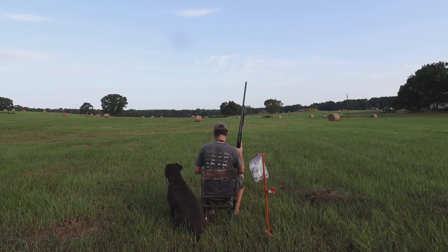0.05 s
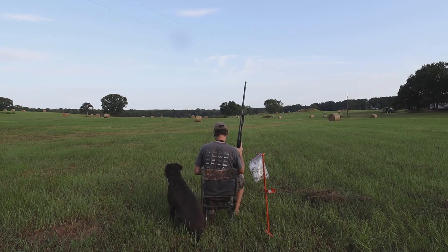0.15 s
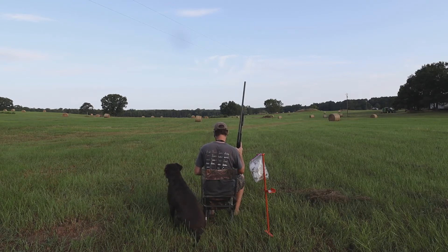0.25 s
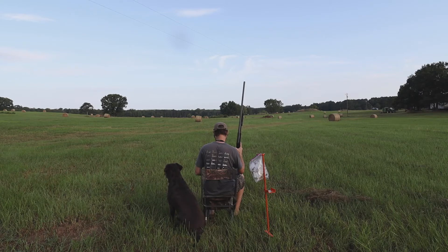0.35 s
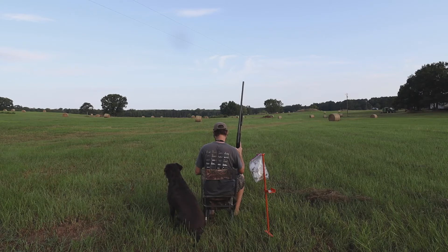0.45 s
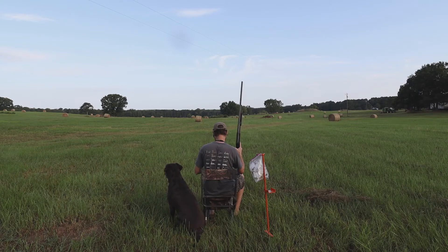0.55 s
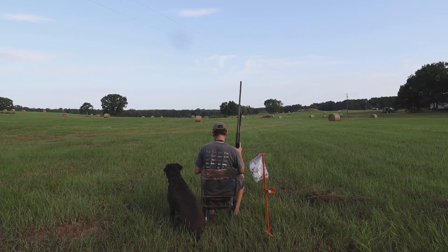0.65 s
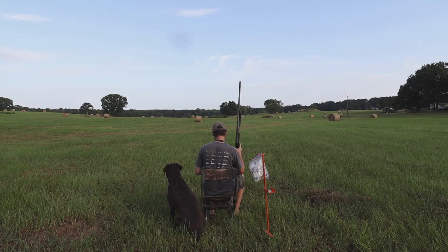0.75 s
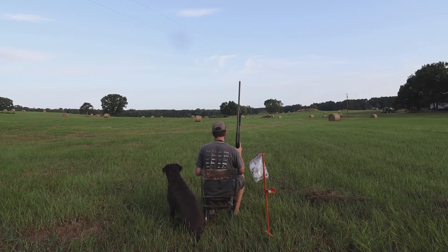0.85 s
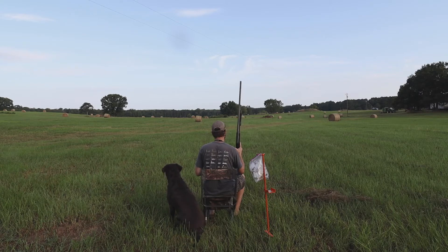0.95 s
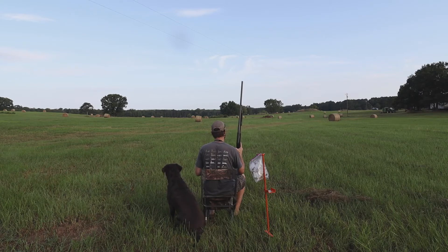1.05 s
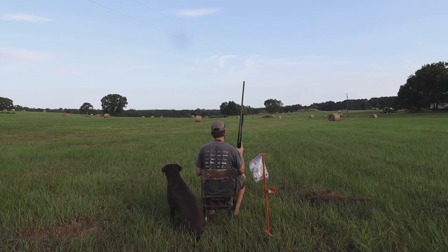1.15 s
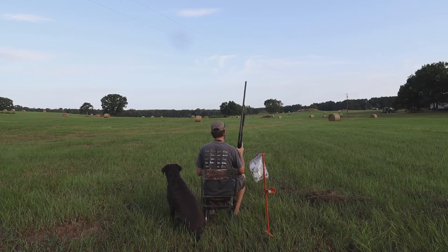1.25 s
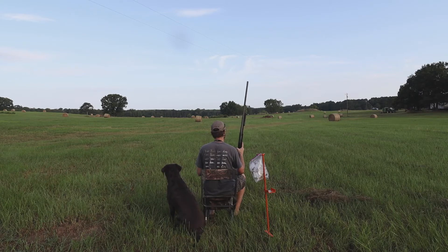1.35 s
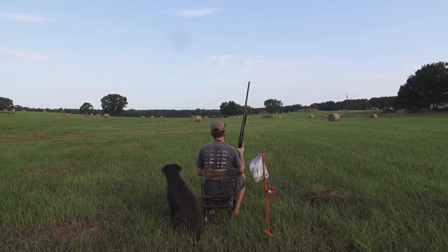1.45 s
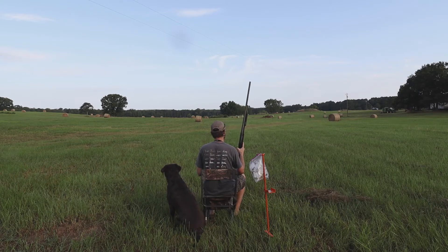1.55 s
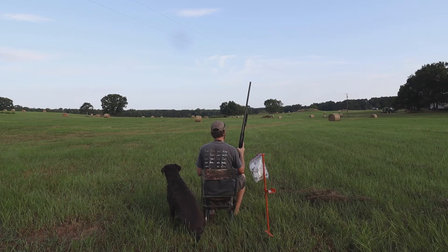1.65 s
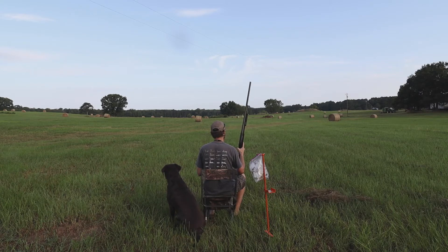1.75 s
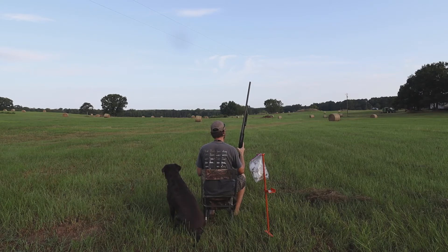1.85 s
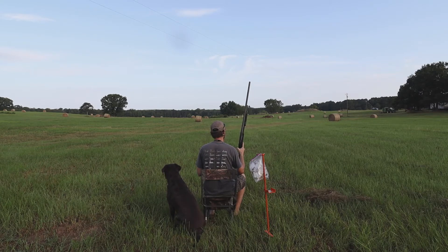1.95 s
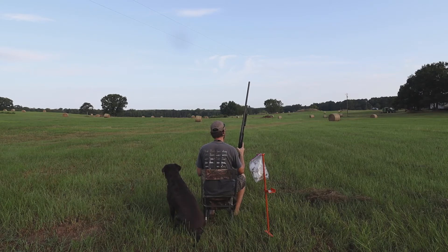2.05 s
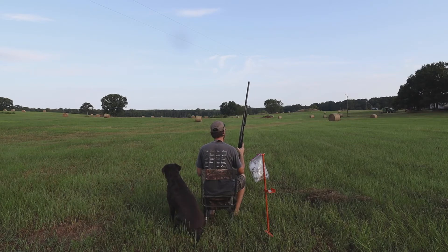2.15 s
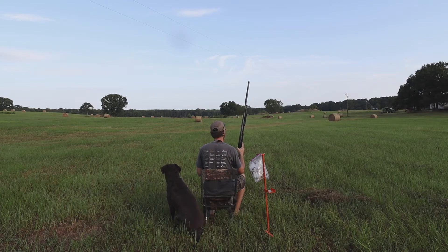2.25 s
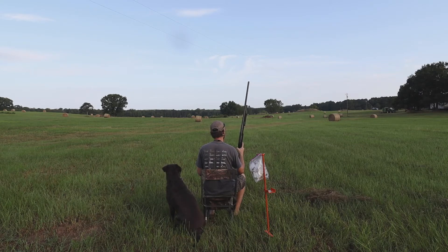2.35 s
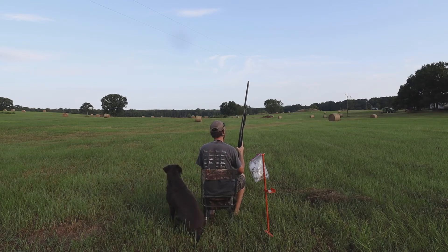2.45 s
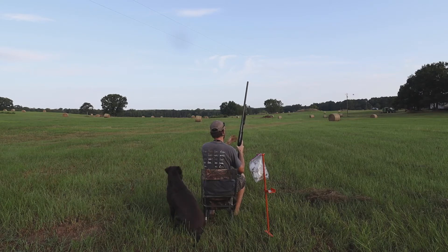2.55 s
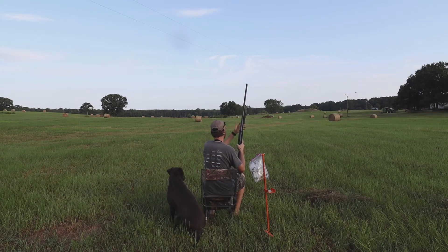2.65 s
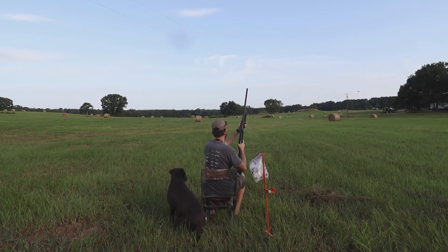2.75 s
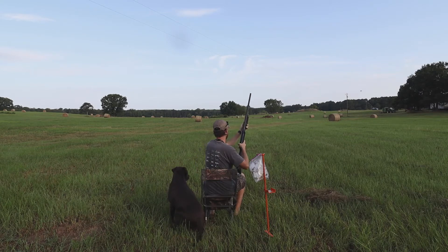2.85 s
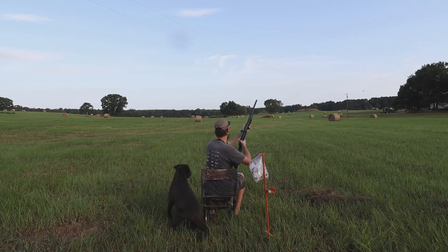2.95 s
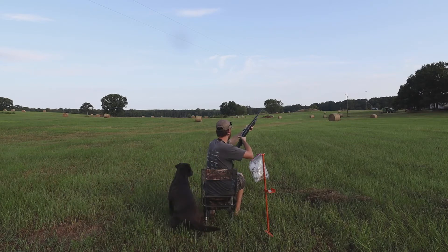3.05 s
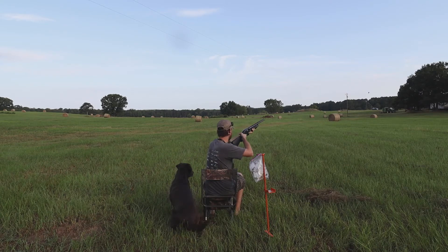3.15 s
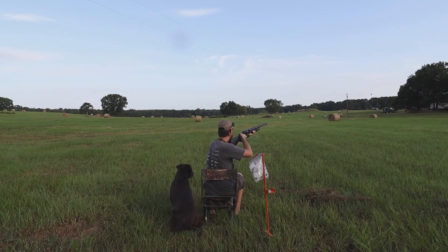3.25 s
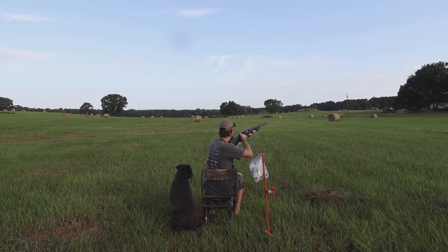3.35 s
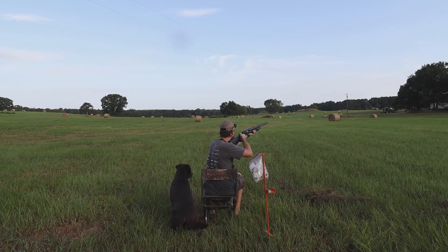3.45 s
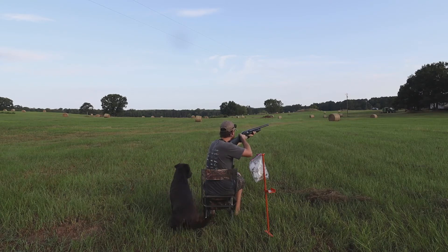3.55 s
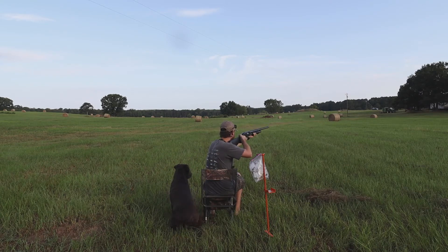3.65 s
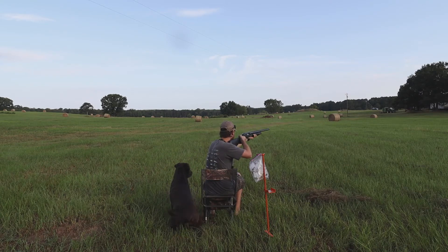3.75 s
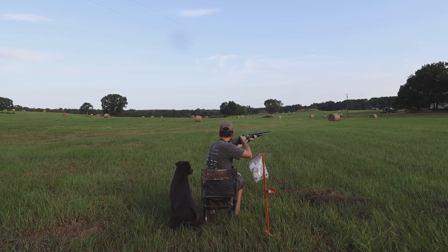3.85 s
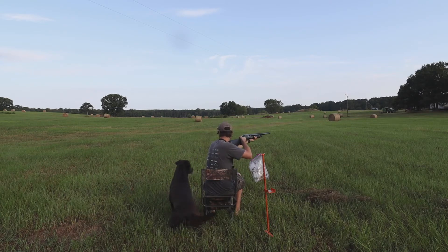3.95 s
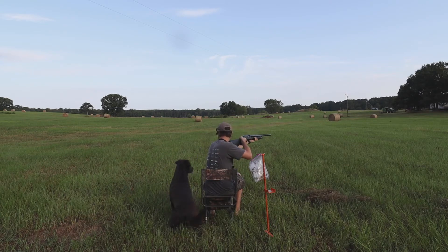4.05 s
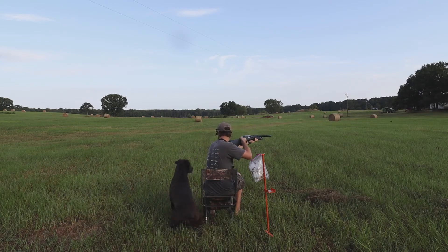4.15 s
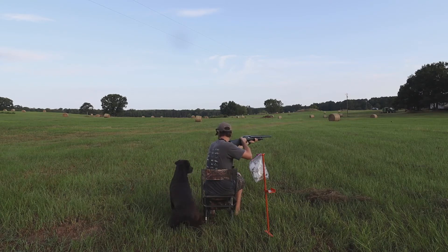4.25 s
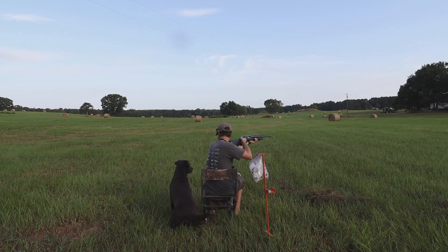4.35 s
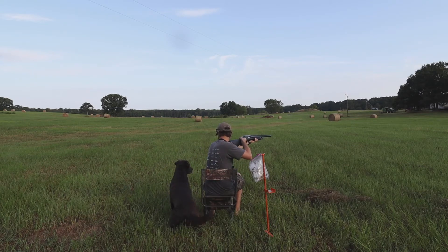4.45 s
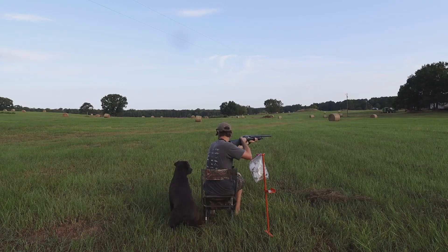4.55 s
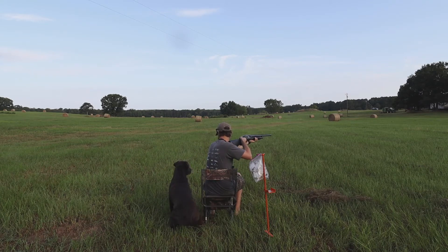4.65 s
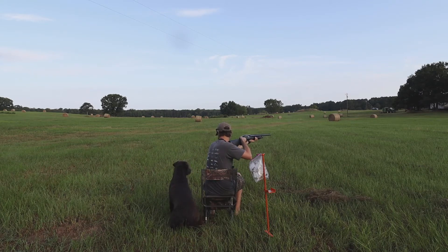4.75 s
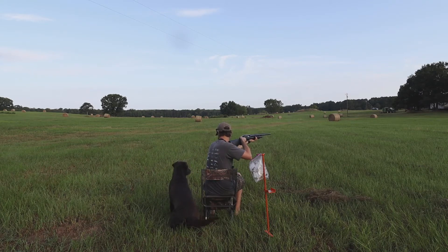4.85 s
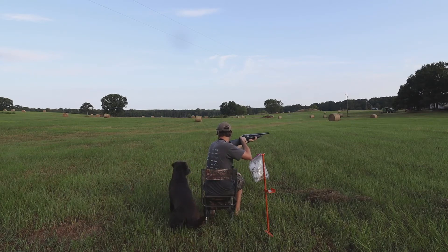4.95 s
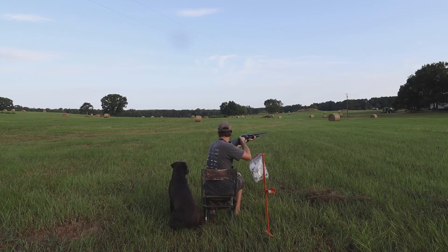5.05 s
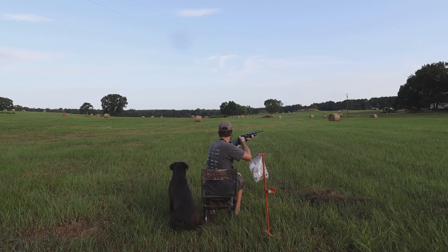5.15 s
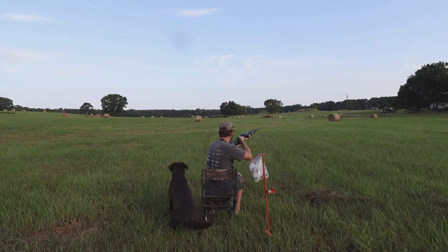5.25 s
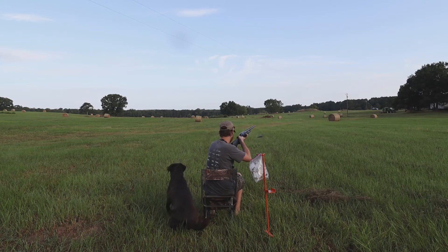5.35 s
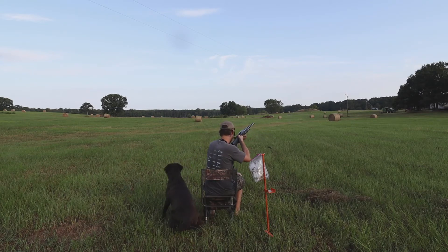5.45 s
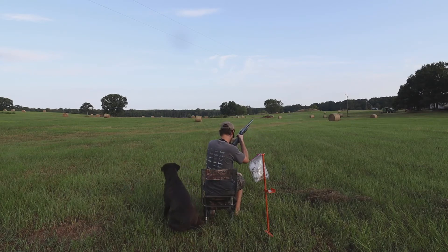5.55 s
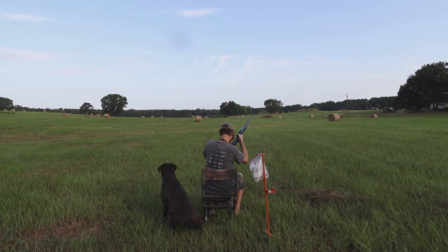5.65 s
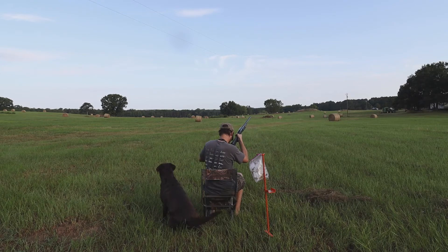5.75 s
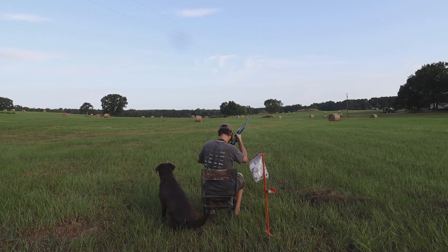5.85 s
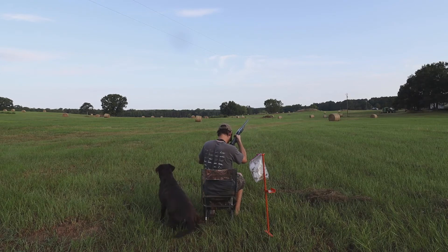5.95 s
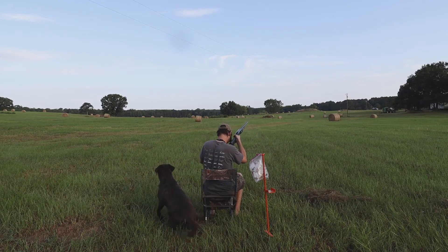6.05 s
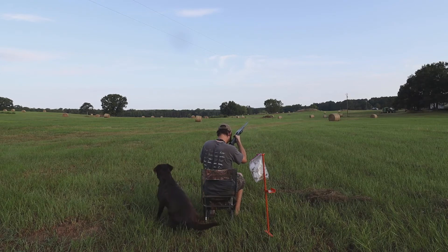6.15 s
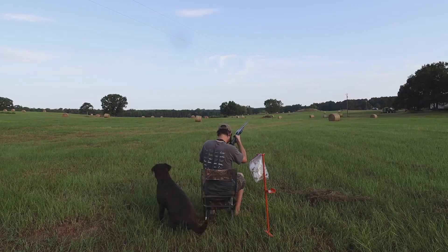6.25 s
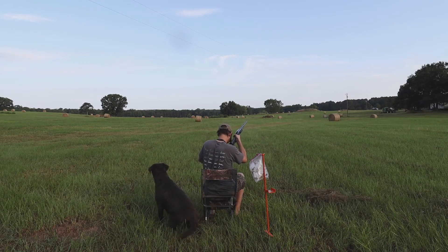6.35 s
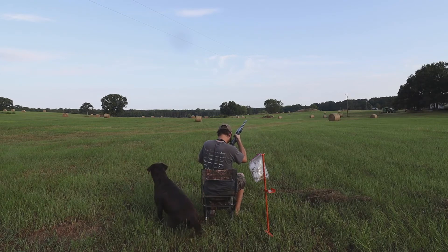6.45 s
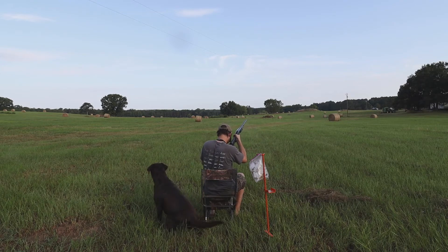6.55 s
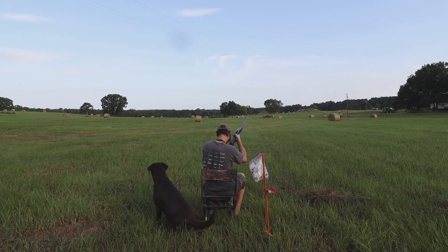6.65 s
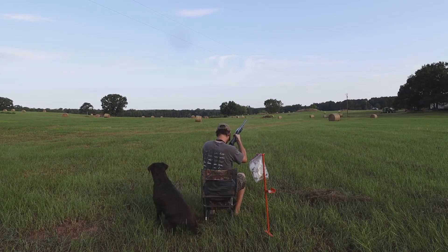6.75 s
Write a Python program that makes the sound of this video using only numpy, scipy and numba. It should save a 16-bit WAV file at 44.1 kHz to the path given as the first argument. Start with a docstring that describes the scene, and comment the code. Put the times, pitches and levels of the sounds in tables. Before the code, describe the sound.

Shrill insects and a far engine drone; catches click, one loud shotgun shot overloads the microphone, echoes return, a bird whistles, the pump clatters.

```python
"""An open hay field: insects shrill and a far engine drones throughout, a few metres from shooter to camera.
Birds whistle, catches click and cloth brushes as a shotgun is shouldered, then it fires once: bursts of noise.
Bales and two tree lines return wavelets and a grainy wash; a soft, low echo of the shot thuds back.
A bird whistles gliding tones, the action is racked with scrapes and ringing knocks, and cloth brushes again.
The microphone overloads on the bangs, and its gain control ducks the field after them."""
import sys
import numpy as np
from scipy import signal
from scipy.fft import rfft, irfft
from scipy.io import wavfile
from numba import njit

SR = 44100
rng = np.random.default_rng(int(sys.argv[2]) if len(sys.argv) > 2 else 0)


def transcribe(signal):
    """Save signal, clipped to [-1, 1], as a 16-bit WAV file at the path in sys.argv[1]."""
    frames = np.atleast_2d(signal).T
    limited = np.clip(frames, -1, 1)
    pcm = np.round(limited * 32767).astype(np.int16)
    wavfile.write(sys.argv[1], SR, pcm)


N = 299880
T = np.arange(N) / SR  # s

# Pressure fronts of the shot. Each row: start in seconds, level in dB, length in seconds, t60 in seconds,
# ring of the microphone housing in dB above that level.
BLAST = [(3.6037, -20, 0.0018, 0.01, -29), (3.6117, 5, 0.0026, 0.0098, -1.5),
         (3.6151, 13, 0.0024, 0.0023, -9), (3.6202, -4.5, 0.002, 0.067, 0)]
MUZZLE_S = BLAST[2][0]  # the strongest front


def undb(db):
    """Decibels to gain."""
    return 10 ** (np.asarray(db) / 20)


def unit(x):
    """Scale to rms 1."""
    return x / np.sqrt(np.mean(x ** 2))


def curve(rows):
    """The columns of a table, joined by straight lines in time."""
    s, *columns = np.transpose(rows)
    return [np.interp(T, s, c) for c in columns]


def noise():
    """White noise of rms 1."""
    return rng.standard_normal(N)


def walk(rate):
    """Random wander: normal draws, rate per second, joined by straight lines."""
    return np.interp(T * rate, np.arange(4096), rng.standard_normal(4096))


def colour(x, points, size=4096):
    """Causal filter shaped by (Hz, relative dB) points that keeps the power of white noise."""
    hz, db = np.transpose(points)
    bins = np.maximum(np.fft.rfftfreq(size, 1 / SR), 1)
    gains_db = np.interp(np.log(bins), np.log(hz), db)
    # folding the cepstrum onto its first half gives minimum phase
    cepstrum = irfft(np.log(undb(gains_db)))
    cepstrum[size // 2:] = 0
    response = irfft(np.exp(2 * rfft(cepstrum)))
    return signal.fftconvolve(x, response / np.linalg.norm(response))[:N]


def band(x, hz, width):
    """A resonance applied twice, for steep skirts."""
    b, a = signal.iirpeak(min(hz, SR / 2 - 1), hz / min(width, SR / 3), fs=SR)
    once = signal.lfilter(b, a, x)
    return signal.lfilter(b, a, once)


def burst(start, length, t60):
    """Envelope that jumps up, holds for a length and dies away."""
    out = np.zeros(N)
    alive = slice(int(start * SR), int((start + length + 2 * t60) * SR))
    out[alive] = np.exp(-np.log(1000) * np.maximum(T[alive] - start - length, 0) / t60)
    return out


def ring(start, hz, t60):
    """One struck mode: a sine that starts at full strength and dies away."""
    out = burst(start, 0, t60)
    alive = out > 0
    out[alive] *= np.sin(2 * np.pi * hz * (T[alive] - start))
    return out


def struck(force, modes):
    """A body of (Hz, dB, t60) modes driven by a force."""
    response = sum((-1) ** k * undb(db) * ring(0, hz, t60) for k, (hz, db, t60) in enumerate(modes))
    return signal.fftconvolve(force, response[:SR // 2])[:N]


@njit
def follow(x, attack, release):
    """Level detector with one step share for rising and another for falling."""
    out, e = np.empty(len(x)), 0.
    for i in range(len(x)):
        e += (abs(x[i]) - e) * (attack if abs(x[i]) > e else release)
        out[i] = e
    return out


def shot(housing_hz=5280, housing_width_hz=900, hiss_db=-31, hiss_t60=0.57):
    """Hammer, muzzle blast and its ground bounces; they set the camera's housing and mount ringing."""
    # Tone of the blast. Each row: frequency in Hz, relative level in dB.
    blast_colour = [(25, -7), (110, 14), (220, -0.5), (400, 6.5), (800, -2), (1500, 6), (3500, 3.5),
                    (6500, -4.5), (8200, 4.5), (11000, -10.5), (15000, -14)]
    # The blast shakes the camera on its mount. Each row: frequency in Hz, level in dB, t60 in seconds.
    mount_modes = [(114.8, -22.5, 0.5), (129, 3.5, 0.03), (308, -11, 0.026)]
    fronts = sum(undb(db) * burst(s, length, t60) for s, db, length, t60, _ in BLAST)
    shaken = sum(undb(db + ring_db) * burst(s, length, t60) for s, db, length, t60, ring_db in BLAST)
    housing = shaken * unit(band(noise(), housing_hz, housing_width_hz))
    mount = sum(undb(db) * ring(MUZZLE_S, hz, t60) for hz, db, t60 in mount_modes)
    # the nearest blades throw back the brightest part
    hiss = undb(hiss_db) * burst(MUZZLE_S, 0, hiss_t60) * noise()
    return colour(fronts * noise(), blast_colour) + housing + mount + hiss


def returning(s, build, t60):
    """Envelope of the return from one stand: it builds up as the front reaches it, then dies away."""
    fired = T > MUZZLE_S
    rise = -(np.minimum(T - s, 0) / build) ** 2
    fall = -np.log(1000) * np.maximum(T - s, 0) / t60
    return fired * np.exp(rise + fall)


def wavelet(hz, cycles):
    """The report after one reflection: a short swing of pressure, centred in 10 ms."""
    t = T[:SR // 100]
    turns = (t - t.mean()) * hz
    return -np.cos(2 * np.pi * turns) * np.exp(-(turns / cycles) ** 2)


def echoes(cycles=0.72, lag_s=0.0007, grain_db=4.5, grain_rate=600, trunk_spread_db=3):
    """The report returns as short wavelets from single objects and as a grainy wash from foliage."""
    # Loudest single echoes, off bales and trunks. Each row: time in seconds before the lag, peak in dB,
    # centre in Hz.
    loudest = [(3.687, -11.5, 1800), (3.819, -15, 1570), (3.861, -23, 1172), (3.887, -20, 1770),
               (3.921, -13.5, 1640), (3.932, -16, 1630), (3.979, -18, 1470), (4.0, -20.5, 1430),
               (4.067, -18.5, 1750), (4.279, -17, 1130), (4.298, -14, 1010), (4.309, -13.5, 1170),
               (4.339, -15, 1890), (4.396, -6, 2020), (4.401, -14, 1500), (4.422, -6.5, 1580),
               (4.45, -18.5, 1090)]
    # Stands of grass and trees. Each row: strongest return in seconds, body in dB, leaf hiss in dB,
    # build-up in seconds, t60 in seconds.
    stands = [(3.63, -37, -19, 0.01, 0.29), (3.818, -31, -26, 0.05, 0.3), (4.02, -43.5, -47.5, 0.081, 1.2),
              (4.302, -30, -41.5, 0.057, 0.57), (4.425, -37.5, -64, 0.04, 1.8)]
    # Tone of the boughs. Each row: frequency in Hz, relative level in dB.
    body_colour = [(100, -21), (350, -19), (700, -2), (1200, 2.5), (2000, 1.5), (3200, -6.5), (6000, -21),
                   (12000, -62)]
    # Tone of the leaves. Each row: frequency in Hz, relative level in dB.
    leaf_colour = [(800, -16), (2500, -5), (3600, -2.5), (4700, 4.5), (6000, 4), (7200, -6), (9000, -7.5),
                   (11000, -23), (15000, -33)]
    leaf_lead_s = 0.013  # the outer leaves answer before the boughs
    trunk_rate, trunk_db, trunk_hz, trunk_octaves = 36, -3, 1410, 0.34  # per s, dB, centre Hz, spread
    trunk_follows = 0.62  # share of the wash's rise and fall in dB that the trunk echoes follow

    body = sum(undb(db) * returning(s, build, t60) for s, db, _, build, t60 in stands)
    leaves = sum(undb(db) * returning(s - leaf_lead_s, build, t60) for s, _, db, build, t60 in stands)
    singles = [(s + lag_s, undb(db), hz) for s, db, hz in loudest]
    # the many lesser trunks, scattered in time, level and pitch
    for k, (early, loud, high) in enumerate(rng.uniform(-1, 1, size=(48, 3))):
        s = stands[1][0] + (k + 1 + early) / trunk_rate
        size = np.interp(s, T, body) ** trunk_follows * undb(trunk_db + trunk_spread_db * loud)
        singles.append((s, size, trunk_hz * 2 ** (trunk_octaves * high)))
    out = np.zeros(N)
    for s, size, hz in singles:
        swing = wavelet(hz, cycles)
        i = min(int(s * SR) - len(swing) // 2, N - len(swing))
        out[i:i + len(swing)] += size * swing
    # boughs answer more strongly than the gaps between
    crackle = undb(grain_db * np.minimum(walk(grain_rate), 2))
    boughs = body * colour(unit(noise() * crackle), body_colour)
    return out + boughs + leaves * colour(noise(), leaf_colour)


def low_echo(start_s=4.202, level_db=-38, hz=117, width_hz=110, length_s=0.016, t60=0.027):
    """A soft, low echo of the shot thuds back: a short burst of narrow noise."""
    return undb(level_db) * burst(start_s, length_s, t60) * unit(band(noise(), hz, width_hz))


def rack(steel_db=-41, stock_db=-22.5, scrape_db=-2, chatter_db=4, chatter_rate=450):
    """Steel parts scrape and slam home, ringing the receiver; a knock's heft sets the whole gun's ring."""
    # Knocks of slide, bolt and shell. Each row: start in seconds, relative level in dB, length in seconds,
    # heft in dB.
    hits = [(5.277, -31, 0.003, -3), (5.2923, -20.5, 0.004, -6), (5.3017, -14.5, 0.0054, 3),
            (5.345, -15, 0.0022, -14), (5.361, -22, 0.0021, -4), (5.3743, -2.5, 0.00079, -16),
            (5.3792, -11, 0.0015, -17), (5.3831, 1.5, 0.0045, -19), (5.3976, 5, 0.0018, 11),
            (5.406, 0, 0.0014, 3)]
    # Tone of scrape and knocks. Each row: frequency in Hz, relative level in dB.
    rack_colour = [(60, -24), (200, -29), (350, -17.5), (650, -14), (1300, -6.5), (2000, -2.5),
                   (3000, -5.5), (4200, -3), (6200, -9), (8200, -9), (9400, -10), (11000, -20.5),
                   (15000, -28)]
    # Ring of barrel and receiver. Each row: frequency in Hz, relative level in dB, t60 in seconds.
    gun_modes = [(1750, -5, .05), (2363, -7, .04), (2682, -4, .06), (2965, -4, .06), (4105, 1, .04),
                 (4214, 0, .04), (4298, -2, .04), (4445, -1, .04), (4538, -3, .04), (4662, -1, .04),
                 (4746, -2, .04), (5275, 2, .05), (5631, -1, .04), (7311, 0, .035), (8160, -4, .025),
                 (8960, -4, .025)]
    # Ring of the whole gun. Each row: frequency in Hz, relative level in dB, t60 in seconds.
    stock_modes = [(872, -5, .09), (1235, 0, .11), (1450, -6, .09)]
    # Slide back and forward. Each row: start in seconds, length in seconds, relative level at the end in dB.
    strokes = [(5.303, 0.018, -33), (5.327, 0.045, -17)]
    knock_t60, stroke_t60 = 0.023, 0.061  # s
    growth_db_per_s = 290  # the scrape grows as the slide gathers speed

    knocks = sum(undb(db) * burst(s, length, knock_t60) for s, db, length, _ in hits)
    sliding = 0
    for s, length, db in strokes:
        growth_db = growth_db_per_s * np.minimum(T - s - length, 0)
        sliding = sliding + undb(db + growth_db) * burst(s, length, stroke_t60)
    chatter = unit(undb(chatter_db * walk(chatter_rate)))  # the slide sticks and slips on its rails
    force = noise() * (knocks + sliding * chatter)
    blows = np.zeros(N)
    for s, db, _, heft_db in hits:
        blows[int(s * SR)] = undb(db + heft_db)
    scrape = undb(scrape_db) * colour(force, rack_colour)
    steel = undb(steel_db) * struck(force, gun_modes)
    return scrape + steel + undb(stock_db) * struck(blows, stock_modes)


def handling():
    """Small catches click and ring, and cloth brushes, as the gun is raised and lowered."""
    # Catches on gun and gear. Each row: start in seconds, level in dB, length in seconds, centre in Hz,
    # width in Hz, ring in dB above that level.
    clicks = [(2.158, -26, 0.0011, 3300, 3000, 2), (2.209, -42.5, 0.0037, 3450, 2500, 0),
              (2.663, -44, 0.0022, 4000, 1500, -6), (2.764, -37, 0.0016, 2140, 1700, 10.5),
              (2.8425, -29, 0.0046, 2010, 5840, -1.5), (2.9225, -32.5, 0.0005, 4150, 8000, -3)]
    # Ring of the catches. Each row: frequency in Hz, relative level in dB, t60 in seconds.
    catch_modes = [(870, 8, 0.018), (1376, 2, 0.034), (1790, 1, 0.024), (2020, 2.5, 0.02), (2380, -5, 0.02),
                   (3010, -3.5, 0.045), (3310, -6, 0.05), (4080, -8, 0.056), (4520, -5, 0.03),
                   (8600, 0, 0.02)]
    # Brushes of cloth. Each row: start in seconds, level in dB, length in seconds, centre in Hz, width in Hz.
    brushes = [(3.042, -53, 0.058, 5940, 10000), (5.46, -47, 0.016, 5540, 5000),
               (5.53, -50, 0.09, 5400, 3500), (5.897, -53, 0.006, 7000, 10000),
               (6.59, -58, 0.13, 6950, 9000)]
    click_t60, brush_t60 = 0.019, 0.11  # s

    ticks, taps = 0, 0
    for s, db, length, hz, width, ring_db in clicks:
        ticks = ticks + undb(db) * burst(s, length, click_t60) * unit(band(noise(), hz, width))
        impulse = signal.unit_impulse(N, int(s * SR)) + 1e-18  # the tiny offset is inaudible
        taps = taps + undb(db + ring_db) * band(impulse, hz, width)
    cloth = 0
    for s, db, length, hz, width in brushes:
        cloth = cloth + undb(db) * burst(s, length, brush_t60) * unit(band(noise(), hz, width))
    return ticks + struck(taps, catch_modes) + cloth


def grass(x, wet_db=-25, t60=0.27):
    """The grass all round scatters a faint, short tail of decaying noise."""
    tail = (noise() * burst(0, 0, t60))[:SR // 2]
    return x + undb(wet_db) * signal.fftconvolve(x, tail / np.linalg.norm(tail))[:N]


def birds(waver=0.0031, flutter_db=2.0):
    """Thin pure whistles that swell and fade while they slide towards a pitch; some lift at the close."""
    # Bird notes. Each row: start in seconds, length in seconds, level in dB before flutter, swell in seconds,
    # starting pitch in Hz, pitch it settles towards in Hz, glide time in seconds, closing lift in Hz.
    notes = [(1.56, 0.068, -53, 0.025, 4450, 3400, 0.053, 0),
             (1.79, 0.06, -54, 0.022, 4500, 3400, 0.045, 0),
             (1.995, 0.028, -56, 0.008, 3600, 4400, 0.015, 0),
             (4.845, 0.18, -43, 0.14, 3390, 2960, 0.036, 30),
             (5.526, 0.34, -38.5, 0.054, 3520, 2840, 0.016, 260)]
    fade_share, lift_time_s = 0.31, 0.0195  # a note fades over this share of its length
    out, pitch_wander, flutter = 0, 1 + waver * walk(74), undb(flutter_db * walk(49))
    for s, length, db, swell_s, start_hz, end_hz, glide_s, lift_hz in notes:
        age = np.clip(T - s, 0, length)
        left = length - age
        glide = (start_hz - end_hz) * np.exp(-age / glide_s)
        hz = end_hz + glide + lift_hz * np.exp(-left / lift_time_s)
        effort = np.minimum(age / swell_s, 1) * np.minimum(left / (fade_share * length), 1)
        out = out + effort * undb(db) * np.sin(2 * np.pi * np.cumsum(hz * pitch_wander) / SR)
    return out * flutter


def insects(throb_db=1.5, swell_db=0.2, unsteady=0.173):
    """Many stridulating insects blur into shrill bands of noise that throb with their wing strokes."""
    # Choruses. Each row: centre in Hz, width in Hz, mid level in dB, mean wing strokes per second.
    choruses = [(4760, 510, -55, 33), (5063, 480, -54.5, 46), (9120, 560, -55, 97), (9570, 210, -59.5, 31),
                (8620, 1200, -60, 58)]
    out = 0
    for hz, width, db, rate in choruses:
        strokes = np.sin(2 * np.pi * np.cumsum(rate * (1 + unsteady * walk(15))) / SR)
        level_db = db + throb_db * strokes + swell_db * walk(4.32)
        out = out + unit(band(noise(), hz, width)) * undb(level_db)
    return out


def field(waver=0.0051, flicker_db=1.2):
    """A far engine with three wavering tones and a rumble, under a soft, faintly humming wash of air."""
    # Tones of the far engine. Each row: mean frequency in Hz, level in dB.
    drone = [(66.4, -49), (76, -51), (153, -59.5)]
    # The engine's rumble over time. Each row: time in seconds, level in dB.
    rumble_level = [(0, -51), (1.4, -48.5), (2.5, -45.5), (4.4, -46.5), (5.2, -43), (6.8, -45.5)]
    # Tone of the rumble. Each row: frequency in Hz, relative level in dB.
    rumble_colour = [(20, -19), (45, -15.5), (70, -4), (100, -3), (135, -9.5), (175, -27), (300, -23),
                     (900, -101)]
    # Distant wash of wind and road over time. Each row: time in seconds, level in dB before flicker.
    air_level = [(0, -45), (2.3, -43.5), (6.8, -45)]
    # Tone of the wash. Each row: frequency in Hz, relative level in dB.
    air_colour = [(30, -17), (180, 2), (280, -4), (400, 3.5), (560, 5.5), (780, 5.5), (1050, 5.5),
                  (1400, 3), (1800, 3), (2200, -5), (2700, -6), (3600, -12.5), (6500, -19.5), (11000, -24),
                  (15000, -24)]
    # Narrow hums in the wash. Each row: centre in Hz, width in Hz, level in dB.
    whine = [(419.5, 10.5, -61), (493, 17, -70.5), (770.2, 32, -56)]
    tones = 0
    for hz, db in drone:
        turns = np.cumsum(hz * (1 + waver * walk(4.76))) / SR
        tones = tones + undb(db) * unit(np.sin(2 * np.pi * turns))
    rumble = undb(curve(rumble_level)[0]) * colour(noise(), rumble_colour)
    air = undb(curve(air_level)[0] + flicker_db * walk(13)) * colour(noise(), air_colour)
    hums = sum(undb(db) * unit(band(noise(), hz, width)) for hz, width, db in whine)
    return tones + rumble + air + hums


def scene():
    """Everything that reaches the one microphone; the grass adds its tail to the gun, gear and low echo."""
    scattered = grass(shot() + low_echo() + rack() + handling())
    return (scattered + echoes() + birds() + insects() + field())[None]


def record(dry, dip_hz=6200, dip_width_hz=800, dip_depth=0.25, knee_db=-12.5, attack_s=0.0039, release_s=0.088):
    """A microphone with a treble dip; gain control ducks after loud bangs, too late to stop them clipping."""
    top_hz = 15350  # nearly nothing passes above this
    sound = dry - min(dip_depth, 1) * band(dry, dip_hz, dip_width_hz)
    heard = follow(sound[0], 1 / (attack_s * SR), 1 / (release_s * SR))
    ducking = np.maximum(heard / undb(knee_db), 1)
    clipped = np.clip(sound / ducking, -1, 1)
    lowpass = signal.ellip(10, .1, 90, top_hz, fs=SR, output="sos")
    return signal.sosfilt(lowpass, clipped)


dry = scene()
out = record(dry)
transcribe(out)
```